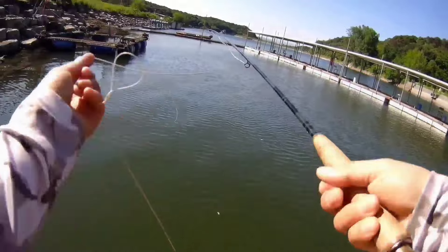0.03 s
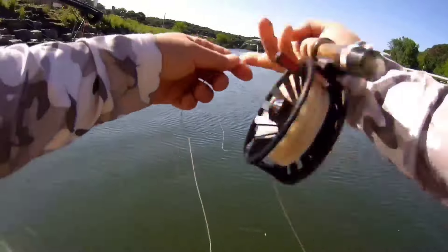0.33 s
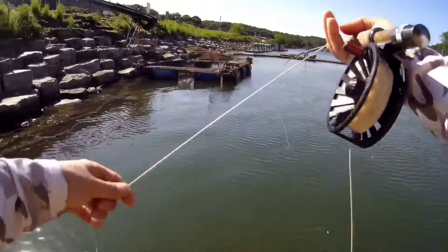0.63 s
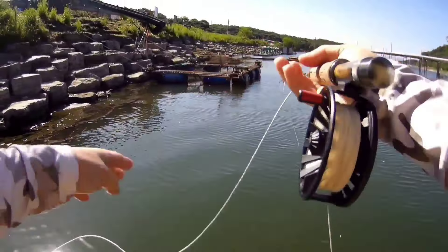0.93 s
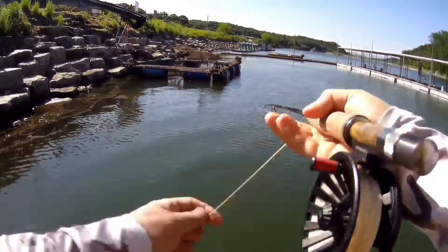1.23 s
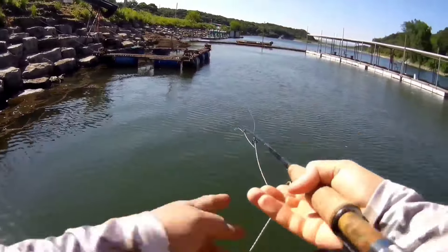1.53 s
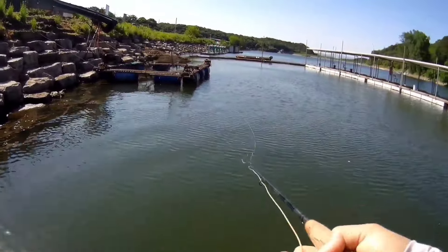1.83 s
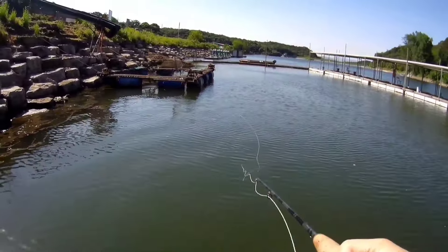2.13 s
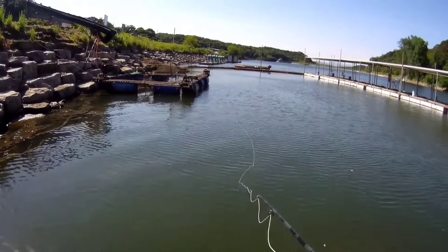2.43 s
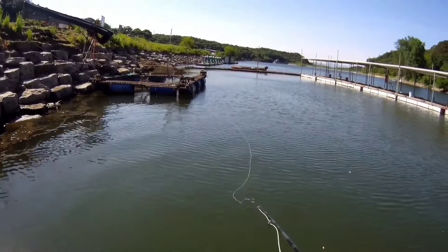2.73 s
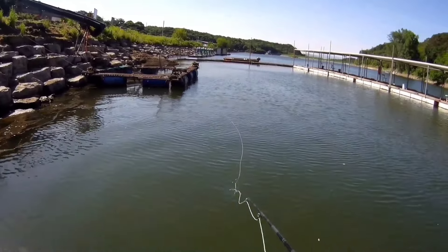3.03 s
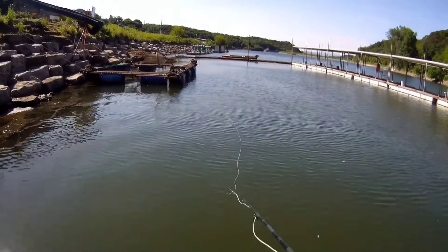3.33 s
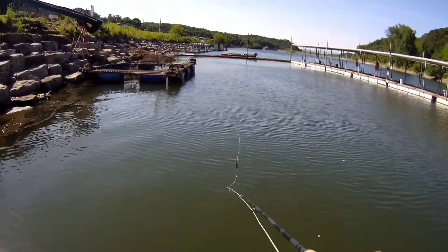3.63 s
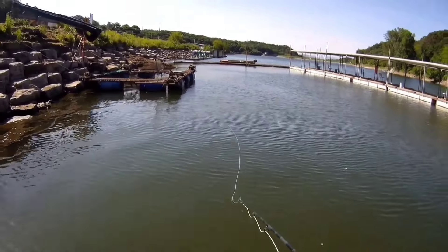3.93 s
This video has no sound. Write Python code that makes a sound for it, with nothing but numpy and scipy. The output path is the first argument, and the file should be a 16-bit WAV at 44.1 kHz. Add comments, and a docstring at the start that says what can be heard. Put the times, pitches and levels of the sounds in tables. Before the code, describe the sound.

Fly line is stripped through rod guides in about seven short rasps, faint at first, strongest with sharp ticks from 1.1 to 2.3 seconds, then softer at 2.7 and 3.6. Sleeves rustle and movement rumbles the microphone over quiet wind and small lapping plips. A soft bump comes at 1.6 seconds. Clothing rubs the microphone from 3.7, with a hard knock at about 3.9.

```python
"""A lake shore, where fly line is stripped in by hand, heard from a camera worn on the chest.
Each pull drags the line over finger and rod guides: tiny slips make the rod rasp, and the line ticks
as it catches and gives dry clicks. Sleeves rustle, the moving body rumbles the microphone, and water
plips and laps over a quiet bed of wind and water. The camera takes a soft bump; near the end clothing
rubs on it and something knocks its case."""
import sys
import numpy as np
from scipy import signal
from scipy.fft import rfft, irfft
from scipy.io import wavfile

SR = 44100
rng = np.random.default_rng(int(sys.argv[2]) if len(sys.argv) > 2 else 0)


def bounce(signal):
    """Save signal as a 16-bit WAV file at the path given by the first command-line argument."""
    frames = np.transpose(np.atleast_2d(signal))
    limited = np.clip(frames, -1, 1)
    pcm = np.round(limited * 32767).astype(np.int16)
    wavfile.write(sys.argv[1], SR, pcm)


N = 176400
TIME = np.arange(N) / SR
HZ = np.maximum(np.fft.rfftfreq(N, 1 / SR), 1)
AROUND = np.arange(-24576, 24576) / SR   # seconds either side of an event's peak
FIBRES_PER_S = 3000   # grain density of all the cloth


def stripping():
    """Hand speed sets the level of the rasp and the rate of the slips that excite the rod."""
    # pulls: start t/s, fastest t/s, end t/s, level/dB, tilt/(dB/octave), focus f/Hz, focus gain/dB
    pulls = [(0.12, 0.426, 0.64, -55.5, 5.5, 5930, 1), (0.538, 0.604, 0.73, -51.5, 2.5, 3600, 4),
             (1.081, 1.223, 1.352, -43.5, 4, 5500, 6), (1.588, 1.723, 1.887, -42.5, -0.5, 4800, 3.5),
             (2.127, 2.215, 2.345, -43, -1.5, 3500, -1.5), (2.591, 2.746, 2.9, -48, -0.5, 4830, 3),
             (3.453, 3.589, 3.68, -49.5, 1.5, 5330, 3.5)]
    # broad colour of the friction: f/Hz, level/dB
    friction_eq = [(300, -5), (1400, -6), (2600, -0.5), (4300, 4.5), (5700, 0.5), (6500, -7.5),
                   (9500, -13.5), (11000, -25), (15500, -28)]
    speed_up, slow_down = 1.1, 1.4   # exponents of a pull's attack and release
    slips_per_s, spread_db = 2600, 2.5   # the rod gets this rate at full speed
    smooth_db, friction_db, focus_octaves = 7.5, 2.5, 0.14
    out, n = np.zeros(N), len(AROUND)
    for start, fastest, end, db, tilt_db, focus_hz, focus_db in pulls:
        arc = np.sin(np.interp(fastest + AROUND, [start, fastest, end], [0, np.pi / 2, 0]))
        speed = arc ** np.where(AROUND < 0, speed_up, slow_down)
        slips = grains(slips_per_s, spread_db, n) * (rng.random(n) < np.sqrt(speed))
        force = slips + from_db(smooth_db) * rng.standard_normal(n)
        grit = grains(slips_per_s, spread_db, n) + rng.standard_normal(n)
        rasp = rms_one(rod(force)) + from_db(friction_db) * colour(grit, friction_eq)
        focus = resonate(rasp, focus_hz, focus_hz * focus_octaves * np.log(2))
        rasp += (from_db(focus_db) - 1) * focus   # each pull has its own bell EQ
        add(out, fastest, from_db(db) * speed * colour(rasp, [(500, 1), (2000, 4)], tilt_db))
    return out * from_db(1.5 * drift(43))


def rod(force):
    """The rod and its guides ring under a force, neighbouring modes in opposite polarity."""
    # resonances of rod and guides: f/Hz, width/Hz, level/dB
    modes = [(2334, 140, -3), (2827, 210, 1), (3420, 270, -2), (4460, 185, 2), (4850, 127, 1.5),
             (5550, 180, -1), (7060, 230, -18.5), (8170, 240, -11)]
    return sum((-1) ** k * from_db(db) * resonate(force, hz, width)
               for k, (hz, width, db) in enumerate(modes))


def catches():
    """The line catches on a guide: a sharp tap on the rod with a short tail of chatter."""
    # taps on the guides: t/s, peak level/dB
    taps = [(1.199, -33.5), (1.326, -36.5), (1.612, -24), (1.617, -30), (1.681, -27), (1.7239, -24.5),
            (1.758, -29.5), (2.1355, -25), (2.142, -28), (2.148, -38), (2.192, -33), (2.2131, -29),
            (2.2405, -28.5), (2.6477, -31.5), (2.771, -31), (3.493, -37.5), (3.6527, -35.5)]
    chatter_db, chatter_t60_s = -17.5, 0.015
    out, age = np.zeros(N), TIME[:SR // 20]
    for s, db in taps:
        force = from_db(chatter_db - 60 * age / chatter_t60_s) * rng.standard_normal(len(age))
        force[0] += 1   # the tap itself
        tick = from_db(db) * peak_one(rod(force) + 0.17 * resonate(force, 2140, width_hz=2800))
        i = int(s * SR)
        out[i:i + len(tick)] += tick[:N - i]
    return out


def clicks_and_plips():
    """Dry clicks of the line and two low plips of water, all hardly ringing."""
    # clicks and plips: t/s, peak level/dB, centre f/Hz
    hits = [(0.445, -41, 6900), (0.6428, -30.5, 8000), (0.7912, -44, 1000), (1.1515, -34.5, 885),
            (1.103, -34, 5330), (1.276, -32, 7500), (1.667, -27.5, 1870), (1.7128, -34, 10000),
            (1.758, -33, 8000), (1.774, -26, 12000), (2.1355, -42, 11000), (2.148, -37, 7000),
            (2.752, -41, 9000)]
    out = np.zeros(N)
    for s, db, hz in hits:
        impulse = signal.unit_impulse(N, int(s * SR))
        out += from_db(db) * peak_one(resonate(impulse, hz, width_hz=0.57 * hz))
    return out


def knocks():
    """A soft bump on the camera, then a hard knock: case ring, a brief bright crack, a shaken mount."""
    # partials of the bump, the case ring with its crack, and the mount: f/Hz, level/dB, t60/s
    bump = [(410, -4.5, 0.0059)]
    ring_and_crack = [(690, -10.5, 0.026), (914, -6.5, 0.009), (1410, 1.5, 0.0087), (1700, -20, 0.013),
                      (2180, -25, .006), (3700, -16, 0.0049), (4700, -20.5, 0.0081), (7500, -21, 0.004)]
    mount = [(131, -24, 0.033), (312, -20.5, 0.0093)]
    knock_s, rise_s = 3.9312, 0.00019
    thud = blow(s=1.5982, rise_s=0.0017, partials=bump)
    return thud + blow(knock_s, rise_s, ring_and_crack) - blow(knock_s, rise_s, mount)


def blow(s, rise_s, partials):
    """A contact builds over its rise time; partials of alternating polarity die away."""
    age = np.maximum(TIME - s, 0)
    attack = 1 - np.exp(-np.minimum(age / rise_s, 10) ** 2)
    ring = np.zeros(N)
    for k, (hz, db, t60) in enumerate(partials):
        decay = from_db(db - 60 * np.minimum(age / t60, 10))
        ring -= (-1) ** k * decay * np.sin(2 * np.pi * hz * age)
    return attack * ring


def rubs():
    """Fibres drag over the camera and stir its case: a hollow, grainy whoosh."""
    # clothing on the camera: peak t/s, rise/s, fall/s, level/dB
    strokes = [(3.735, 0.044, 0.033, -42), (3.798, 0.032, 0.027, -35.5), (3.875, 0.079, 0.086, -42),
               (3.968, 0.011, 0.027, -37.5)]
    # colour of the rubbed case: f/Hz, level/dB
    case_eq = [(80, -17), (260, -3.5), (500, -8), (690, 1), (900, 2), (1150, -2.5), (1420, -0.5),
               (1750, -2.5), (2100, -8), (3000, -11.5), (4800, -12), (6300, -23), (8200, -28), (15500, -62)]
    envelope = swells(strokes) * from_db(1.9 * drift(70))
    fibres = grains(FIBRES_PER_S) + 0.57 * rng.standard_normal(N)
    return envelope * colour(fibres, case_eq)


def sleeves():
    """Cloth fibres slip in uneven clumps while the arms move."""
    # sleeve movements: peak t/s, rise/s, fall/s, level/dB, tilt/(dB/octave)
    rustles = [(.03, 0.14, 0.22, -52, 2.5), (.60, 0.17, 0.088, -53.5, 2.5), (.995, 0.044, 0.028, -48.5, 1),
               (1.175, 0.093, 0.11, -49, 1.5), (1.41, 0.069, 0.033, -52, 3), (1.475, 0.043, 0.14, -50, .5),
               (1.64, 0.073, 0.09, -48, 0.5), (1.987, 0.079, 0.053, -50, 1),
               (2.118, 0.028, 0.033, -47, 0.5), (2.39, 0.071, 0.031, -57, 2), (2.505, 0.04, 0.054, -56, 2),
               (2.95, 0.074, 0.094, -56, -1)]
    # colour of the cloth: f/Hz, level/dB
    cloth_eq = [(60, 0), (250, 0), (420, 2), (540, 0), (700, 5.5), (1000, -3.5), (1450, -4.5), (2100, -8),
                (3200, -8.5), (5000, -13.5), (6500, -22.5), (10000, -26), (15500, -44.5)]
    out, n = np.zeros(N), len(AROUND)
    for s, rise, fall, db, tilt_db in rustles:
        fibres = grains(FIBRES_PER_S, size=n) + 0.61 * rng.standard_normal(n)
        add(out, s, from_db(db) * swell(rise, fall) * colour(fibres, cloth_eq, tilt_db))
    return out * from_db(1.75 * drift(29))


def scrapes():
    """Smooth fabric slides over itself with a crisp hiss."""
    # fabric slides: peak t/s, rise/s, fall/s, level/dB
    slides = [(.095, 0.034, 0.027, -53.5), (.60, 0.034, 0.061, -67), (1.23, 0.13, .06, -72),
              (1.50, 0.046, .08, -65.5), (1.74, 0.037, .04, -54.5), (2.135, 0.017, .015, -60),
              (2.25, 0.054, 0.035, -61), (2.52, .04, .03, -76), (3.0, 0.028, .05, -65.5),
              (3.729, 0.0058, 0.0076, -51.5), (3.785, 0.034, 0.022, -53), (3.885, 0.049, .03, -57)]
    # colour of the smooth fabric: f/Hz, level/dB
    fabric_eq = [(1500, -20), (4000, 3), (9000, 1.5), (12000, -2.5), (15500, -7)]
    fibres = grains(FIBRES_PER_S) + rng.standard_normal(N)
    return swells(slides) * colour(fibres, fabric_eq)


def rumble():
    """Body movement and air buffet the microphone with lumps of low noise."""
    # buffets: peak t/s, rise/s, fall/s, level/dB, centre f/Hz
    buffets = [(0.054, 0.041, 0.026, -39.5, 85), (.27, .025, 0.037, -42.5, 22.1),
               (0.466, 0.038, 0.038, -43, 75), (.605, 0.013, 0.036, -41, 87),
               (1.181, 0.027, .08, -46.5, 55), (1.36, 0.072, 0.054, -45, 58), (1.62, 0.047, 0.046, -52, 70),
               (2.11, 0.026, 0.024, -45.5, 65.6), (2.157, 0.011, 0.015, -44, 85.4),
               (2.971, 0.069, 0.043, -53.5, 50), (3.047, 0.0084, .012, -45, 69),
               (3.56, 0.0092, 0.011, -45.5, 73.6), (3.721, 0.035, 0.034, -38.5, 55.4),
               (3.745, .025, 0.024, -39.5, 196), (3.814, 0.018, .02, -45, 71),
               (3.966, 0.02, 0.019, -41.5, 130)]
    out = np.zeros(N)
    for s, rise, fall, db, hz in buffets:
        hump_eq = [(hz / 4, -10), (hz, 0), (2 * hz, -12), (8 * hz, -38), (100 * hz, -90)]
        low_noise = colour(rng.standard_normal(len(AROUND)), hump_eq)
        add(out, s, from_db(db) * swell(rise, fall) * low_noise)
    return out


def water():
    """Splashes are brief clusters of bubbles; stray ones lap along the shore all the time."""
    # small splashes: peak t/s, rise and fall/s, level/dB, centre f/Hz
    splashes = [(0.787, 0.034, -59.5, 640), (0.992, 0.0069, -51.5, 805), (1.189, 0.0083, -46.5, 666),
                (1.463, 0.015, -48.5, 1480), (2.402, 0.0092, -55.5, 650), (2.496, 0.015, -53, 735),
                (2.842, 0.0058, -51.5, 680), (2.932, .018, -59, 720), (3.36, 0.011, -56, 770)]
    out = from_db(-64.5) * bubbles(per_s=160, hz=589, octaves=0.86, size=N, pitch_count=12)
    for s, length, db, hz in splashes:
        cluster = bubbles(per_s=900, hz=hz, octaves=0.25, size=len(AROUND), pitch_count=4)
        add(out, s, from_db(db) * swell(length, length) * cluster)
    return out


def bubbles(per_s, hz, octaves, size, pitch_count):
    """Bubbles ring briefly at random moments, pitched either side of a centre."""
    ring_cycles = 14
    clicks = grains(per_s, spread_db=1.2, size=size)
    voice = rng.integers(0, pitch_count, size)
    pitches = hz * 2 ** (octaves * np.linspace(-1, 1, pitch_count))
    return rms_one(sum(resonate(clicks * (voice == k), f, 2.6 * f / ring_cycles)
                       for k, f in enumerate(pitches)))


def lake():
    """A quiet bed of wind and water that wavers a little."""
    # colour of the ambience: f/Hz, level/dB
    bed_eq = [(25, 0), (60, -2), (130, -5), (250, -8.5), (400, -7), (540, -9.5), (720, -12), (1050, -19.5),
              (1500, -16.5), (2100, -20.5), (4800, -25), (6500, -33), (15500, -36.5)]
    return from_db(-56.5 + drift(3.3)) * colour(rng.standard_normal(N), bed_eq)


def from_db(db):
    """Decibels to gain."""
    return 10 ** (np.asarray(db) / 20)


def rms_one(x):
    """Scale to an rms of 1."""
    return x / np.sqrt(np.mean(x ** 2) + 1e-20)


def peak_one(x):
    """Scale to a peak of 1."""
    return x / (np.abs(x).max() + 1e-20)


def colour(x, points, tilt_db=0):
    """EQ through (f/Hz, level/dB) points, tilted by tilt_db per octave; rms 1."""
    hz, db = np.transpose(points)
    octave = np.log2(np.maximum(np.fft.rfftfreq(len(x), 1 / SR), hz[0]))
    gain = from_db(np.interp(octave, np.log2(hz), db) + tilt_db * octave)
    return rms_one(irfft(rfft(x) * gain, len(x)))


def drift(rate_hz):
    """A random wobble, mostly slower than rate_hz; rms 1."""
    return rms_one(irfft(rfft(rng.standard_normal(N)) / (1 + (HZ / rate_hz) ** 2), N))


def resonate(x, hz, width_hz):
    """One resonance with unity gain at its peak."""
    r = np.exp(-np.pi * width_hz / SR)
    feedback = [1, -2 * r * np.cos(2 * np.pi * hz / SR), r * r]
    return signal.lfilter(np.array([1, 0, -1]) * (1 - r * r) / 2, feedback, x + 1e-18)


def grains(per_s, spread_db=0, size=N):
    """Random clicks, made uneven in level by spread_db; rms 1."""
    gains = from_db(spread_db * np.minimum(rng.exponential(1, size), 4))
    return rms_one(gains * rng.choice([-1, 1], size) * (rng.random(size) < per_s / SR))


def swell(rise, fall):
    """A bell-shaped envelope with its own rise and fall."""
    width = np.where(AROUND < 0, rise, fall)
    return np.exp(-.5 * np.minimum((AROUND / width) ** 2, 100))


def swells(rows):
    """One envelope from several swells, summed in power."""
    power = np.zeros(N)
    for s, rise, fall, db in rows:
        add(power, s, (from_db(db) * swell(rise, fall)) ** 2)
    return np.sqrt(power)


def add(out, s, x):
    """Mix in a short sound whose middle falls at time s."""
    first = int(s * SR) - len(x) // 2
    lo, hi = max(first, 0), min(first + len(x), N)
    out[lo:hi] += x[lo - first:hi - first]


def scene():
    """Camera, line, body and shore in a mono mix."""
    camera = rubs() + knocks()
    line = stripping() + catches()
    body = sleeves() + scrapes() + rumble()
    shore = lake() + water()
    return (camera + line + clicks_and_plips() + body + shore)[None]


def record(dry):
    """Gentle saturation rounds the loudest peak and a steep low-pass cuts the top."""
    cutoff_hz = 15700
    low_pass = signal.ellip(14, .1, 80, cutoff_hz, fs=SR, output="sos")
    return signal.sosfilt(low_pass, np.tanh(dry))


dry = scene()
out = record(dry)
bounce(out)
```